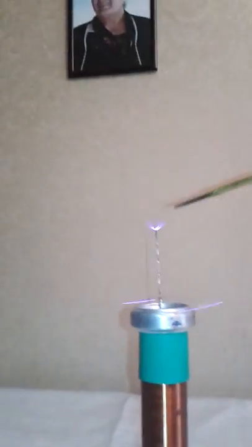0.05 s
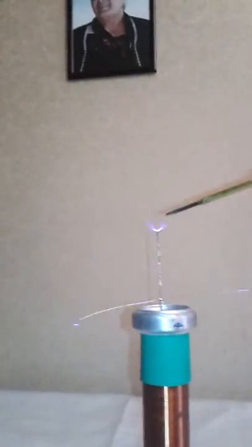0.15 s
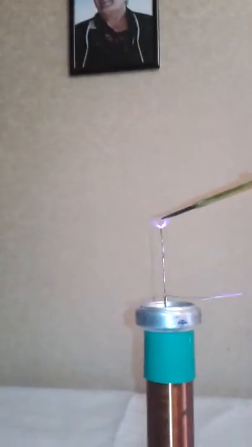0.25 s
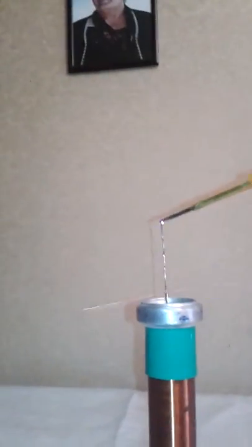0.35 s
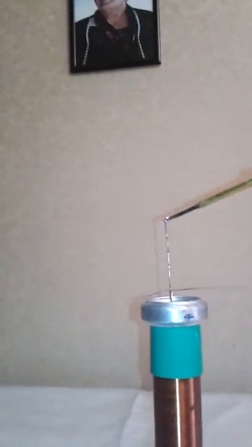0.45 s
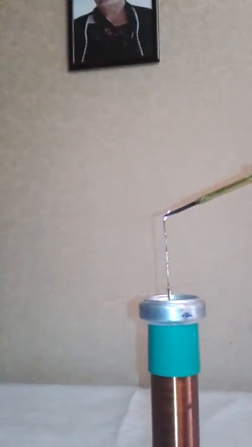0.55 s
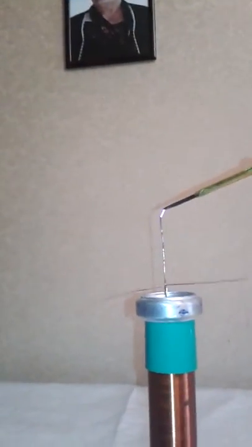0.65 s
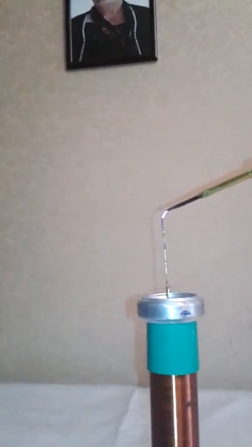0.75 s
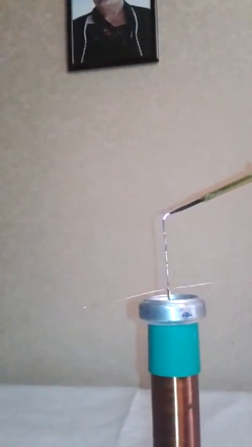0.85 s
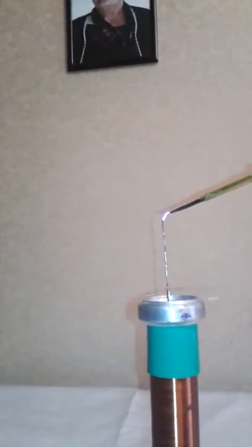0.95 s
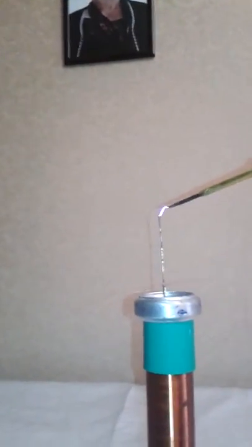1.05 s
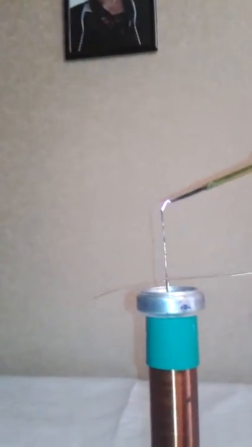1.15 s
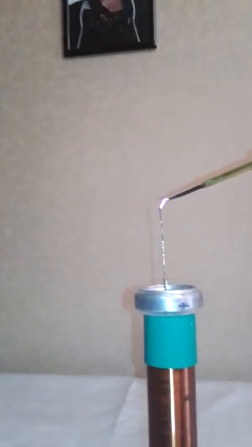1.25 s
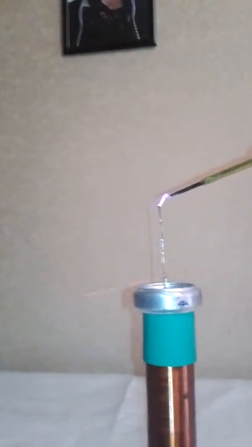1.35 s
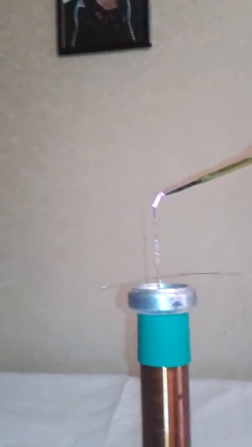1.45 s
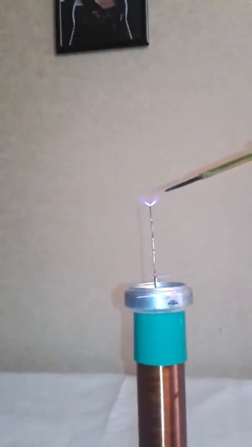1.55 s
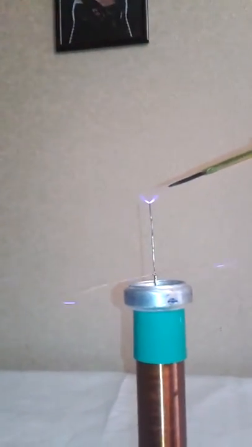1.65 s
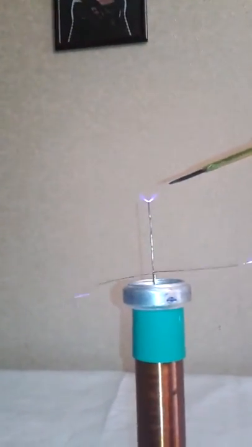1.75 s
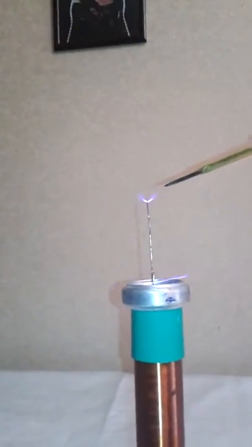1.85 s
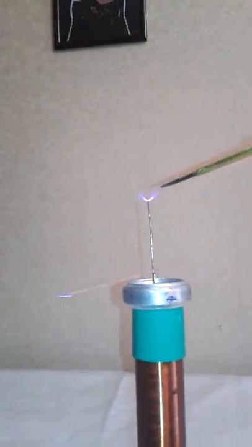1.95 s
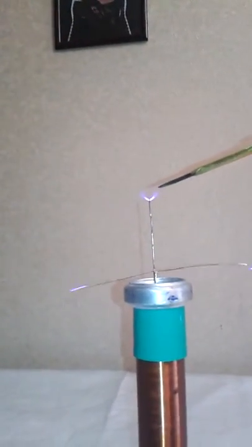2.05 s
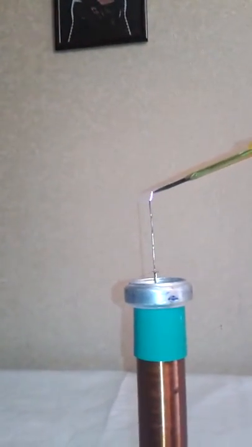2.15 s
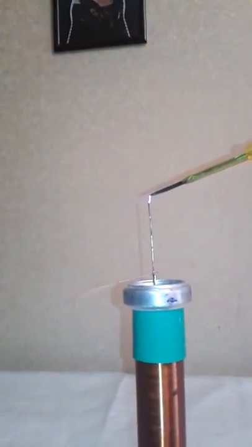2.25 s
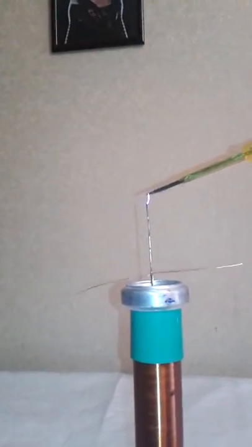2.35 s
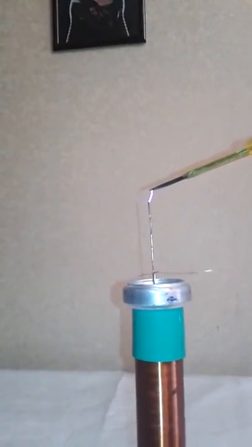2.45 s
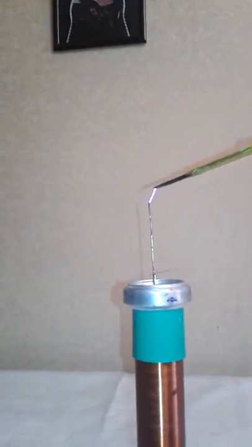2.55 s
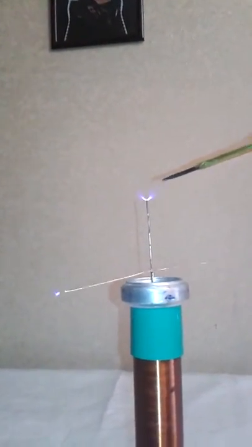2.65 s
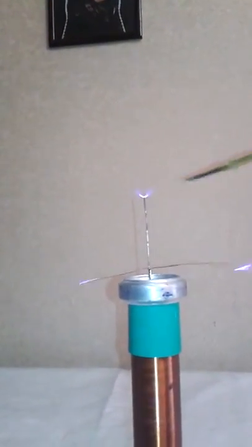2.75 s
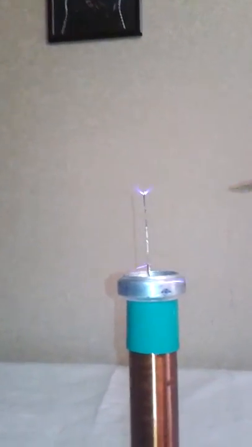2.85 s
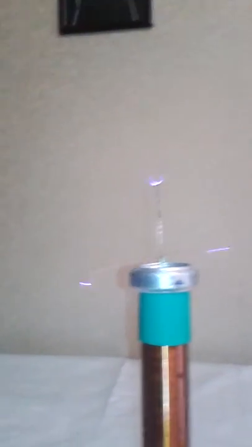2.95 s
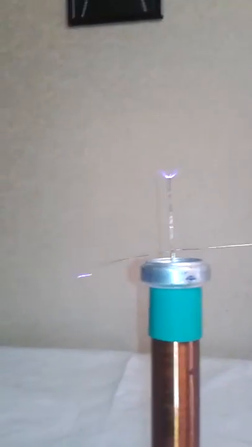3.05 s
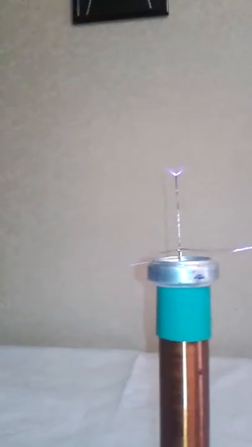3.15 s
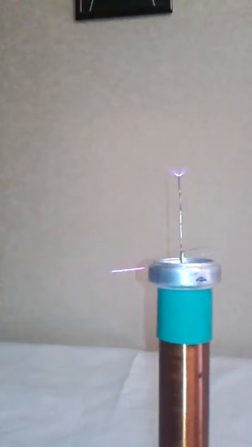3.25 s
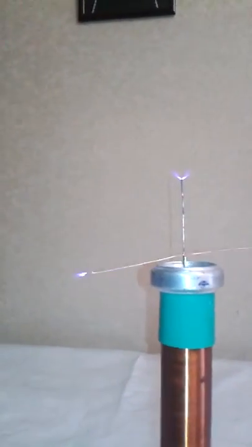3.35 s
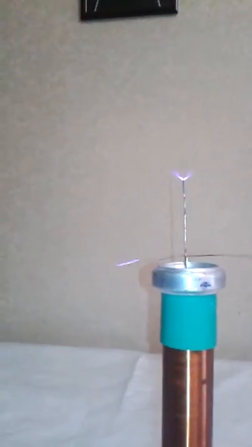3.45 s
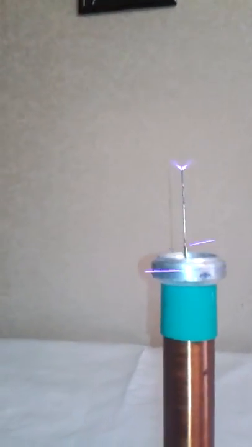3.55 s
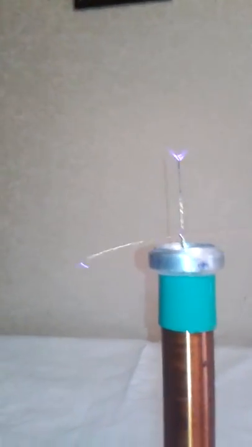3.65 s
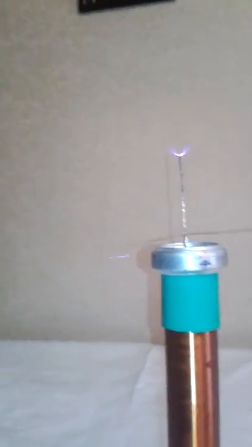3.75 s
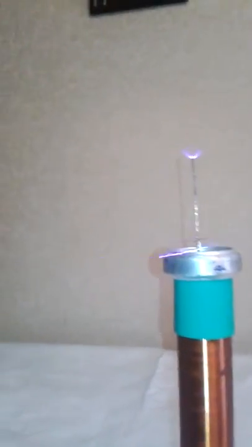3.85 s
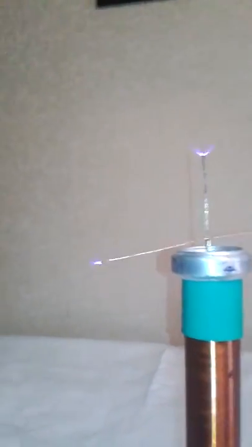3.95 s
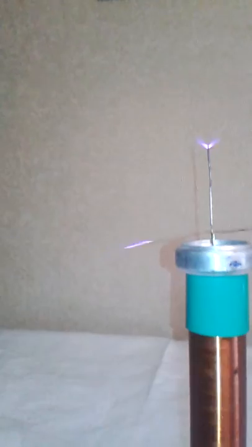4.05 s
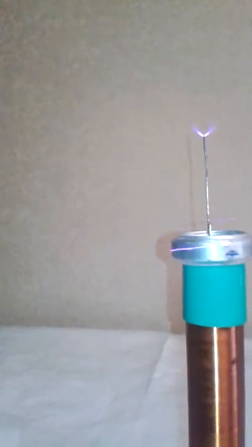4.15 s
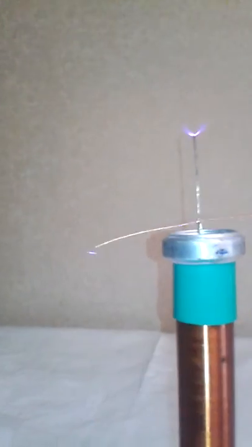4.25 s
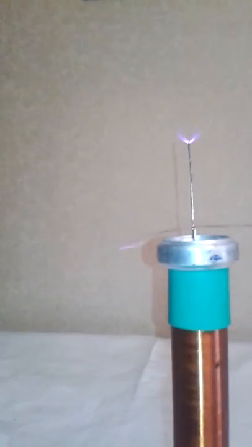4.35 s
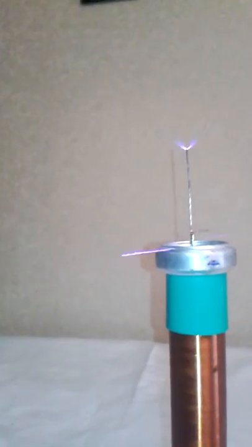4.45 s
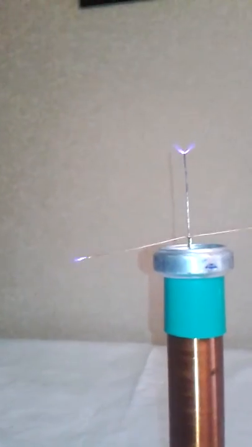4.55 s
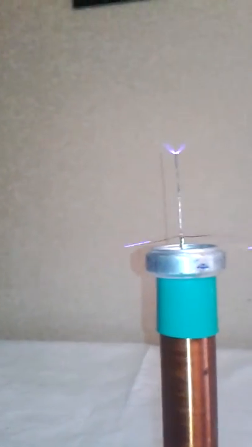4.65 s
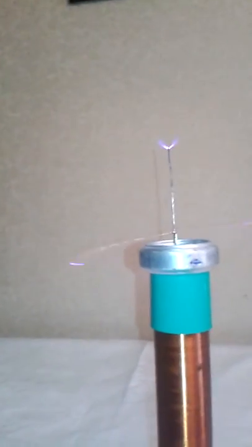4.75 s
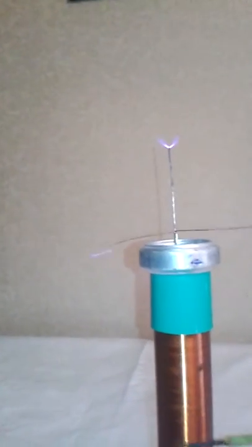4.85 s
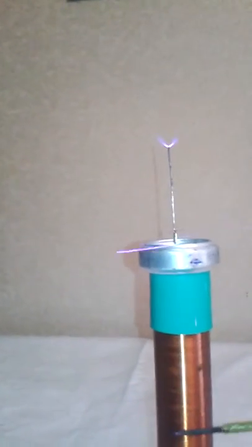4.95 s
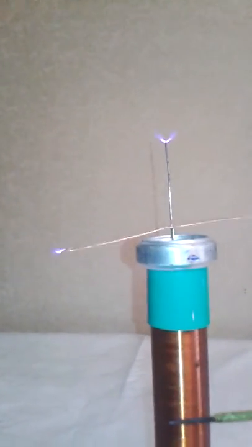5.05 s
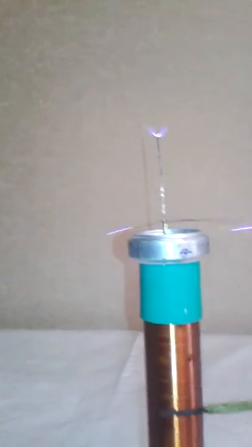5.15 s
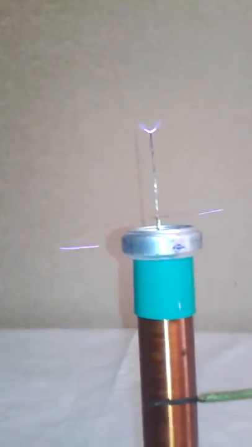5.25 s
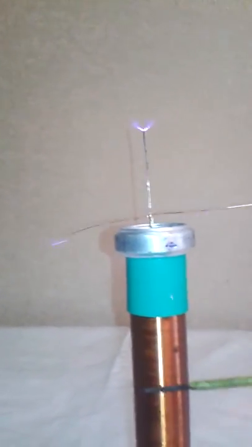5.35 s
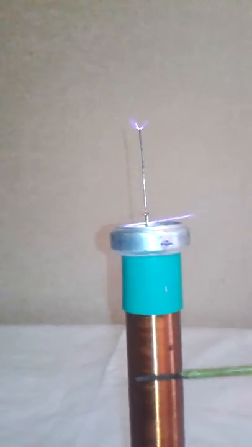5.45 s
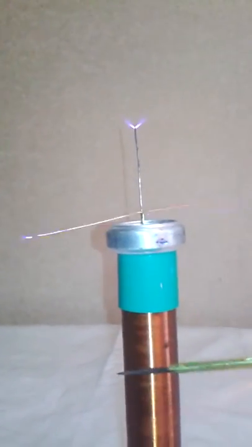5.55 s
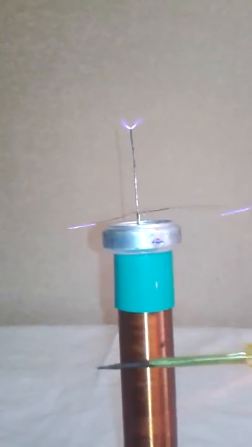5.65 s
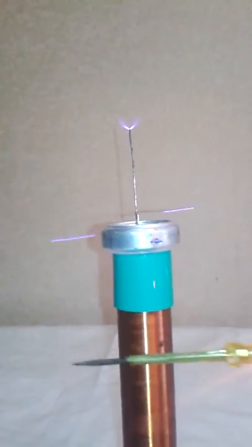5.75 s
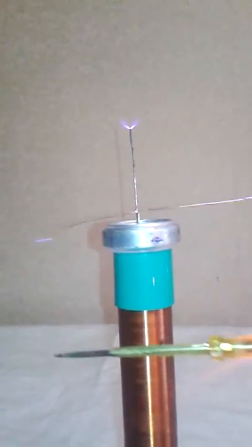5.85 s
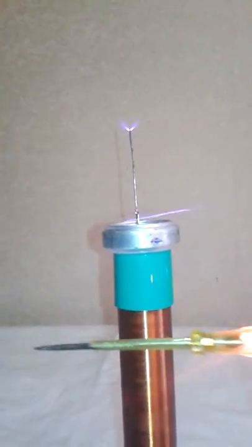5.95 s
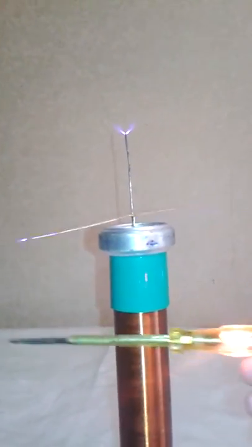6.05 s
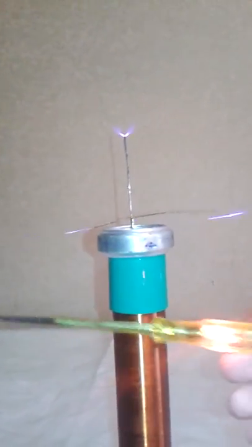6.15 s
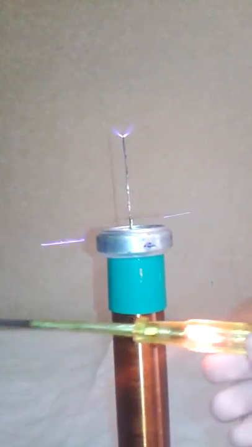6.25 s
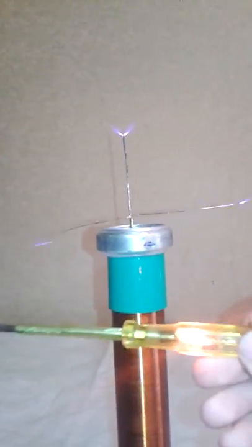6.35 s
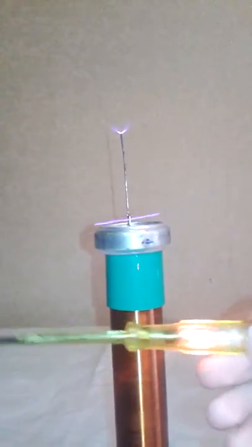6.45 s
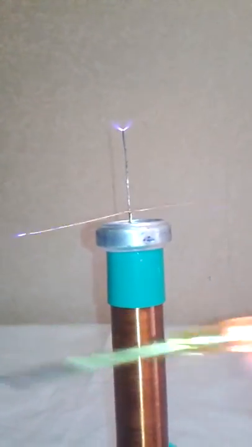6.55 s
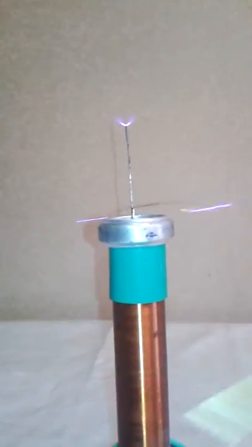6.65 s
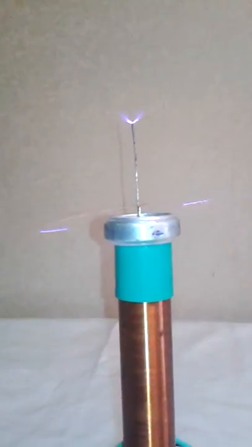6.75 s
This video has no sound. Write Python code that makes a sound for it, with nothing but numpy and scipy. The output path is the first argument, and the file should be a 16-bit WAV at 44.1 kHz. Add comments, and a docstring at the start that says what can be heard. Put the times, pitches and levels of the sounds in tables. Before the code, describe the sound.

A small high-voltage coil hisses and crackles with a thin, high ring, flaring in short bursts with sharp little snaps.

```python
"""Corona sprays from a wire tip and a spinning wire on a small high-voltage coil: a dense rain of tiny
sparks that flares in short bursts and sinks to a quiet arc while a rod is held near. It stands in a
quiet room and sounds dry, as from close by, on one small mono microphone that rings in the treble.
Behind it the room rumbles and hums, with soft low thuds and brief low tones swelling in its wash,
and a small hard thing is tapped."""
import sys
import numpy as np
from scipy import signal
from scipy.io import wavfile
from scipy.ndimage import uniform_filter1d

SR = 44100
rng = np.random.default_rng(int(sys.argv[2]) if len(sys.argv) > 2 else 0)


def wav_out(sig):
    """Save sig, one row per channel (or a flat mono array), as 16-bit PCM at SR to the path in sys.argv[1]."""
    wavfile.write(sys.argv[1], SR, np.round(np.clip(np.atleast_2d(sig).T, -1, 1) * 32767).astype(np.int16))


N = 298998

# Self noise of the microphone: frequency_hz, gain_db
HISS_COLOUR = [(500, 0), (2400, -1.5), (2950, -2), (3600, -5), (12000, -6)]
# Room tone, a low wash over a deeper rumble: time_s, wash_db, rumble_db
ROOM_LEVELS = [(0.0, -62.5, -72), (0.07, -76, -77), (0.19, -65, -69), (0.32, -71.5, -80),
               (0.43, -68.5, -74), (0.53, -72.5, -76.5), (1.11, -86, -78.5), (1.47, -73.5, -72.5),
               (1.51, -62, -65), (1.6, -64, -60.5), (1.72, -64.5, -72), (1.78, -73, -64),
               (1.98, -63.5, -78.5), (2.42, -77.5, -77), (3.04, -65, -75), (3.15, -75, -78),
               (3.3, -63.5, -76), (3.68, -65.5, -73), (4.06, -62.5, -69), (4.17, -70, -72),
               (4.4, -63.5, -76), (4.52, -59.5, -74), (4.62, -63.5, -79), (4.72, -66, -66),
               (5.05, -64.5, -78), (5.34, -66.5, -70), (5.4, -71.5, -76), (5.56, -73, -67),
               (5.61, -64, -82), (5.75, -62.5, -72), (5.85, -66, -63.5), (6.04, -65, -78), (6.78, -69, -69)]
# Spectra of the wash and the rumble: frequency_hz, gain_db
WASH_COLOUR = [(90, -2.5), (130, -3), (200, 4), (300, 2), (420, -4), (600, -15.5), (1000, -38.5)]
RUMBLE_COLOUR = [(30, -11.5), (45, -2), (63, -2), (85, -9), (120, -2), (200, -53.5)]
# Faint hum in the room: time_s, pitch_hz, level_db
HUM = [(0, 62, -81), (1.0, 59.4, -84), (2.8, 61.3, -76), (3.4, 60.4, -84), (4.2, 60.9, -81),
       (4.7, 60.4, -67), (5.6, 62, -80), (6.2, 65.8, -79), (6.78, 65.2, -65)]
# Soft low thuds, and brief low tones swelling in the room's wash: start_s, level_db, pitch_hz
THUDS_AND_TONES = [(1.505, -55, 480), (1.508, -43, 159), (1.53, -39, 121), (1.566, -46, 190),
                   (1.643, -45.5, 197), (1.588, -46, 201), (1.702, -46.5, 178), (4.513, -40, 223),
                   (4.574, -46, 203), (4.694, -46.5, 300), (4.822, -52, 290), (5.08, -46, 282),
                   (5.345, -49, 275), (5.604, -48, 287), (5.662, -43.5, 284), (5.695, -56, 302),
                   (5.79, -56, 270), (5.74, -45, 251), (4.421, -46, 130)]
# Taps on the hard object: start_s, strength_db, tilt_db_per_octave
TAPS = [(3.917, -38.5, 24), (3.98, -43, 8), (4.205, -45.5, 7), (4.317, -38, 12), (4.742, -52, 4)]
# Modes of that object: pitch_hz, gain_db, t60_s
OBJECT_MODES = [(757, -6, 0.21), (863, 1, 0.15), (1047, -14, 0.21), (1146, -7, 0.16), (1277, -14, 0.087),
                (2000, -28.5, 0.045)]
# A faint discharge at the microphone, all treble ring: frequency_hz, gain_db
RING_COLOUR = [(600, -65), (1200, -53.5), (1900, -51), (2400, -24), (2950, -51.5), (3700, -43.5),
               (4400, -24), (4700, -14.5), (5000, -17), (5400, -8), (5800, -27.5), (6350, 1.5), (6740, 7.5),
               (7100, -1), (7450, -23), (8000, -20), (8600, -59), (12000, -63.5)]
# Body that a strong discharge adds, in three colours: frequency_hz, gain_db
OPEN_BODY = [(300, -26), (627, -23), (922, -14), (1250, -22.5), (1970, -20), (2400, -19), (2900, -15.5),
             (3700, -19.5), (4170, -17), (4520, -21), (4720, -13), (5150, -17.5), (5600, -10.5),
             (6300, -1.5), (7000, -8), (7850, -25.5), (8700, -21.5), (9500, -39.5), (10100, -23.5),
             (10900, -28), (11700, -21.5)]
HOLLOW_BODY = [(300, -17.5), (700, -23), (1200, -14.5), (1550, -15), (1950, -22.5), (2380, -10),
               (2600, -14), (2750, -23.5), (2980, -26), (3250, -23), (3680, -15), (3980, -24.5),
               (4150, -21.5), (4400, -19.5), (4750, -13.5), (5600, -10), (6400, -1), (7000, -16.5),
               (7850, -34), (8700, -21), (9500, -40), (10100, -26), (10900, -41), (11700, -26)]  # mostly early on, perhaps from the angle of the microphone
LATE_BODY = [(300, -32), (627, -18), (1150, -10.5), (1600, -16.5), (2100, -21), (2600, -19.5), (3400, -22),
             (3800, -17.5), (4200, -13), (4520, -23), (4800, -10), (5300, -8), (6300, -5.5), (7000, -4),
             (7850, -29.5), (8700, -16), (9500, -39), (10100, -32), (10900, -55), (11700, -17.5)]  # the last seconds: a lower voice, a dip in the upper midrange
# Blend of the body colours, the rest being open: time_s, hollow_share, late_share
BODY_BLEND = [(0, 0.75, 0.08), (1, 0.92, 0.03), (1.5, 1, 0.05), (2.2, 0.7, 0), (2.6, 0.94, 0),
              (2.9, 1, 0.17), (3.1, 0.53, 0.3), (3.4, 0.37, 0.18), (4.1, 0.1, 0.3), (4.8, 0.23, 0.32),
              (5.5, 0.15, 0.57), (6.1, 0.06, 0.8), (6.78, 0.19, 0.9)]
# Single sharp sparks: time_s, strength_db
SNAPS = [(0.0405, -37.0), (0.0717, -36.5), (0.2105, -37.5), (0.2125, -38.0), (0.2859, -29.5),
         (0.2983, -37.0), (0.3377, -38.0), (0.4104, -44.5), (0.5116, -51.0), (0.5148, -52.5),
         (0.5185, -51.5), (0.5349, -50.5), (0.5393, -52.5), (0.5726, -51.0), (0.5931, -49.0),
         (0.6019, -48.0), (0.6043, -53.0), (0.6098, -42.5), (0.6939, -55.5), (0.7156, -53.5),
         (0.7435, -52.0), (0.813, -57.0), (0.9071, -54.5), (0.9128, -54.5), (0.9171, -57.0),
         (0.9901, -54.0), (1.0079, -54.5), (1.1028, -56.5), (1.1429, -57.0), (1.1965, -58.5),
         (1.1995, -55.5), (1.2214, -50.5), (1.224, -47.0), (1.2661, -49.0), (1.3913, -41.5),
         (1.3936, -44.5), (1.4397, -42.5), (1.4697, -45.5), (1.5503, -43.5), (1.5637, -45.5),
         (1.5749, -45.0), (1.7292, -40.0), (1.8167, -30.5), (1.8469, -33.0), (1.8485, -33.5),
         (1.8501, -34.0), (1.8544, -34.0), (1.9458, -34.0), (1.9591, -33.0), (1.9871, -35.5),
         (2.0985, -35.0), (2.1396, -38.5), (2.189, -45.5), (2.3422, -51.5), (2.4388, -48.5),
         (2.4681, -45.0), (2.4703, -43.0), (2.474, -43.0), (2.5049, -50.0), (2.5711, -48.0),
         (2.6391, -49.5), (2.6568, -48.5), (2.6607, -47.5), (2.6638, -48.0), (2.8004, -43.0),
         (2.8368, -42.0), (2.8445, -38.0), (3.1422, -37.0), (3.1638, -33.5), (3.1662, -31.0),
         (3.1683, -36.0), (3.2732, -36.0), (3.2771, -34.0), (3.2791, -35.5), (3.294, -39.5),
         (3.3076, -38.0), (3.3092, -38.5), (3.3378, -39.5), (3.3587, -39.5), (3.4038, -35.0),
         (3.5706, -34.5), (3.661, -38.0), (3.6644, -37.0), (3.7574, -38.5), (3.778, -33.0), (3.7936, -34.0),
         (3.8051, -28.5), (3.8068, -28.5), (3.81, -31.0), (3.8127, -30.5), (3.827, -36.5), (3.8322, -32.0),
         (3.9009, -33.5), (3.9041, -36.5), (3.9173, -36.5), (3.9206, -32.5), (3.9301, -33.5),
         (3.9326, -33.0), (3.9356, -35.0), (3.9906, -36.0), (3.9963, -37.5), (4.0246, -33.0),
         (4.0802, -32.5), (4.2752, -35.0), (4.2807, -34.5), (4.2832, -34.0), (4.3694, -33.5),
         (4.389, -31.5), (4.3922, -32.0), (4.3965, -29.5), (4.4038, -33.0), (4.4164, -28.0),
         (4.4192, -29.5), (4.4845, -30.0), (4.4931, -28.5), (4.4977, -32.5), (4.4998, -33.0),
         (4.5053, -32.5), (4.5153, -33.5), (4.5204, -33.0), (4.578, -34.5), (4.5874, -33.5), (4.741, -34.0),
         (4.8341, -37.5), (4.9106, -36.0), (4.9143, -41.0), (4.9176, -40.0), (4.9638, -39.0),
         (4.9667, -38.5), (4.9701, -34.0), (5.022, -36.0), (5.0251, -34.5), (5.0277, -39.0),
         (5.0371, -34.0), (5.0416, -34.0), (5.0451, -37.0), (5.0761, -35.5), (5.1405, -41.0),
         (5.1424, -38.5), (5.3136, -38.5), (5.3568, -39.5), (5.4471, -38.0), (5.4573, -41.5),
         (5.5409, -38.0), (5.5502, -40.0), (5.5525, -35.0), (5.5583, -40.5), (5.5623, -38.5),
         (5.6416, -38.5), (5.7192, -37.0), (5.751, -36.0), (5.8035, -35.5), (5.8647, -39.5),
         (5.9439, -43.5), (5.9512, -39.5), (5.962, -38.5), (5.9649, -35.0), (6.0412, -36.0), (6.054, -37.5),
         (6.0571, -37.0), (6.0627, -37.5), (6.0643, -39.5), (6.1213, -37.0), (6.1683, -38.0),
         (6.2641, -36.5), (6.321, -36.0), (6.324, -37.5), (6.4408, -40.0), (6.4499, -38.5), (6.4545, -36.0),
         (6.4566, -38.5), (6.4582, -36.5), (6.5289, -40.5), (6.5308, -38.0), (6.5401, -33.5),
         (6.5458, -39.5), (6.55, -37.0)]
# Bursts of streamers: start_s, length_s, strength_db
FLARES = [(0.04, 0.094, -53), (0.195, 0.0065, -50), (0.26, 0.016, -47.5), (0.28, 0.003, -44),
          (0.292, 0.016, -43), (0.335, 0.042, -51.5), (0.385, 0.014, -54.5), (0.4, 0.019, -53.5),
          (0.51, 0.012, -60), (0.583, 0.007, -72), (0.594, 0.02, -57.5), (0.689, 0.005, -57),
          (0.708, 0.039, -59), (0.744, 0.0081, -60), (0.808, 0.018, -60), (0.903, 0.012, -59),
          (0.984, 0.018, -57), (1.095, 0.003, -61), (1.138, 0.004, -64), (1.194, 0.0067, -55.5),
          (1.213, 0.014, -52), (1.237, 0.035, -53.5), (1.308, 0.065, -55), (1.386, 0.067, -49.5),
          (1.459, 0.018, -51), (1.503, 0.011, -50.5), (1.562, 0.012, -51.5), (1.669, 0.034, -57),
          (1.796, 0.0037, -49), (1.811, 0.007, -40.5), (1.836, 0.0045, -40), (1.843, 0.011, -38),
          (1.864, 0.023, -43), (1.939, 0.025, -39.5), (1.978, 0.013, -43), (2.028, 0.01, -44),
          (2.056, 0.019, -51), (2.133, 0.015, -45), (2.156, 0.004, -46), (2.169, 0.022, -55.5),
          (2.298, 0.04, -60), (2.425, 0.017, -55.5), (2.453, 0.01, -57), (2.465, 0.01, -49),
          (2.558, 0.03, -54.5), (2.651, 0.0078, -53), (2.726, 0.032, -54), (2.814, 0.077, -52.5),
          (2.998, 0.053, -51), (3.119, 0.029, -42.5), (3.149, 0.019, -41), (3.262, 0.048, -47),
          (3.353, 0.011, -46.5), (3.402, 0.011, -51), (3.42, 0.01, -58), (3.544, 0.0089, -44),
          (3.65, 0.034, -46), (3.756, 0.013, -52), (3.77, 0.0087, -39.5), (3.788, 0.01, -43),
          (3.805, 0.014, -42.5), (3.822, 0.017, -43.5), (3.899, 0.0068, -42.5), (3.914, 0.0046, -43),
          (3.927, 0.008, -42), (3.979, 0.0079, -43), (4.02, 0.02, -43.5), (4.105, 0.022, -49),
          (4.274, 0.015, -51), (4.359, 0.017, -46), (4.383, 0.028, -46), (4.409, 0.005, -43),
          (4.418, 0.003, -45), (4.483, 0.041, -45.5), (4.556, 0.032, -46), (4.683, 0.083, -47.5),
          (4.778, 0.062, -50), (4.902, 0.022, -50), (4.957, 0.011, -44.5), (5.021, 0.0072, -40),
          (5.033, 0.0078, -44.5), (5.074, 0.02, -44), (5.133, 0.048, -48), (5.194, 0.076, -47.5),
          (5.323, 0.047, -54), (5.436, 0.018, -53), (5.535, 0.003, -46), (5.548, 0.005, -49),
          (5.556, 0.007, -51), (5.602, 0.056, -52), (5.74, 0.043, -49.5), (5.798, 0.009, -60),
          (5.836, 0.041, -51), (5.942, 0.024, -49.5), (6.051, 0.0083, -45), (6.106, 0.013, -49.5),
          (6.147, 0.13, -49), (6.271, 0.042, -50), (6.313, 0.046, -47), (6.449, 0.005, -45),
          (6.465, 0.003, -50), (6.496, 0.004, -58), (6.528, 0.003, -43), (6.538, 0.011, -43.5),
          (6.588, 0.0077, -53), (6.652, 0.11, -54.5)]
# Steady discharge, low while the rod holds the arc: time_s, strength_db, midrange_crackle_db
CORONA = [(0, -49, -1.5), (0.26, -49, -1.5), (0.47, -60, -1.5), (0.6, -64, 0), (0.67, -63, -9),
          (0.75, -66, -10), (0.92, -64, -16), (1.15, -71, -13), (1.3, -59, -12.5), (1.44, -61.5, -8),
          (1.55, -51.5, -1), (1.89, -47, -3.5), (2.14, -47, -1), (2.165, -53.5, -1), (2.23, -61.5, 2),
          (2.5, -59, -7), (2.72, -54.5, -5), (2.9, -48.5, -4), (3.22, -49, -1), (3.45, -45, -0.5),
          (3.74, -48, 1), (3.8, -48.5, 2), (3.87, -47.5, 3), (4.01, -48.5, 2), (4.1, -43, 0),
          (4.32, -52, 8), (4.45, -48, 3), (4.68, -46.5, 3.5), (4.86, -52, 4), (5.1, -49.5, -1.5),
          (5.355, -47.5, 1), (5.372, -51.5, -1.5), (5.55, -52, -0.5), (5.72, -47.5, -1.5), (5.86, -52, 3),
          (5.9, -52.5, -1.5), (6.05, -51, 0), (6.2, -50, -4.5), (6.35, -50, -0.5), (6.41, -53, -0.5),
          (6.48, -50.5, 2.5), (6.52, -50, 0), (6.78, -47.5, 0)]

HISS_DB, LOW_CUT_HZ, HIGH_CUT_HZ, DC_OFFSET = -93, 58, 11800, -.0003
SNAP_HZ, SNAP_SINK_HZ_PER_DB, SNAP_SPREAD_HZ = 5980, 14, 140  # stronger snaps ring lower
SNAP_WIDTH_S, SNAP_CLICK_DB = .00036, 6
DRAIN_SHARE, DRAIN_S = .75, .003
STRIKE_S, DIE_S = .0011, .0057
SPUTTER_DB, SPUTTERS_PER_S = .7, 40
SAG_SHARE, RECOVER_S = .19, .14
HUSH_SHARE, GATHER_S = .45, .008


def gain_of(db):
    """Decibels to amplitude."""
    return 10 ** (np.asarray(db) / 20)


def unit_rms(x):
    """Scales to rms 1."""
    return x / np.sqrt(np.mean(x ** 2) + 1e-20)


def curve(rows):
    """The columns of a table (time_s, value, ..) read at every sample."""
    times, *columns = np.transpose(rows)
    return np.array([np.interp(np.arange(N) / SR, times, column) for column in columns])


def add(mix, start_s, sound):
    """Mixes a sound in at start_s."""
    part = mix[round(start_s * SR):][:len(sound)]
    part += sound[:len(part)]


def colour(x, spectrum, size=8192):
    """Passes x through a minimum-phase filter of energy 1, shaped by (frequency_hz, gain_db) rows."""
    hz, db = np.transpose(spectrum)
    bin_hz = abs(np.fft.fftfreq(size, 1 / SR)) + 1
    log_gain = np.log(gain_of(np.interp(np.log(bin_hz), np.log(hz), db)))
    response = np.fft.ifft(np.exp(np.conj(signal.hilbert(log_gain)))).real[:size // 2]
    return signal.oaconvolve(x, response / np.linalg.norm(response))[:N]


def wander(per_s):
    """Smooth random motion of rms 1 that changes about per_s times a second."""
    width = max(int(SR / per_s), 1)
    return unit_rms(uniform_filter1d(uniform_filter1d(rng.standard_normal(N), width), width))


def lag(x, time_s):
    """Follows x with the time constant time_s."""
    keep = np.exp(-1 / (time_s * SR))
    return signal.lfilter([1 - keep], [1, -keep], x)


def microphone_hiss():
    """The microphone's own faint noise floor."""
    return gain_of(HISS_DB) * colour(rng.standard_normal(N), HISS_COLOUR)


def room_tone():
    """The quiet room: a lumpy low wash, a deeper rumble and a hum that drifts in pitch."""
    wash_db, rumble_db = curve(ROOM_LEVELS)
    wash = colour(rng.standard_normal(N), WASH_COLOUR) * gain_of(wash_db + wander(21))
    rumble = colour(rng.standard_normal(N), RUMBLE_COLOUR) * gain_of(rumble_db + 2.7 * wander(12))
    hum_hz, hum_db = curve(HUM)
    hum = np.sqrt(2) * gain_of(hum_db + 2 * wander(6)) * np.sin(2 * np.pi * np.cumsum(hum_hz) / SR)
    return wash + rumble + hum


def thuds_and_tones(rise_s=.0045, t60_s=.062):
    """Soft low thuds, and brief low tones swelling in the room's wash: each is one damped sine."""
    out, t = np.zeros(N), np.arange(SR // 4) / SR
    for start_s, db, pitch_hz in THUDS_AND_TONES:
        envelope = gain_of(db - 60 * t / t60_s) * (1 - np.exp(-t / rise_s))
        add(out, start_s, envelope * np.sin(2 * np.pi * pitch_hz * t))
    return out


def taps(rise_s=.00071):
    """Taps ring the modes of a small hard object; a brighter tap favours the upper ones."""
    out, t = np.zeros(N), np.arange(SR // 4) / SR
    hz, mode_db, t60_s = np.transpose(OBJECT_MODES)[:, :, None]
    attack = 1 - np.exp(-t / rise_s)
    for start_s, db, tilt_db in TAPS:
        decays = gain_of(mode_db + tilt_db * np.log2(hz / 1000) - 60 * t / t60_s)
        modes = decays * np.sin(2 * np.pi * hz * t)
        add(out, start_s, gain_of(db - 7) * modes.sum(0) * attack)
    return out


def wire_drift(x, depth_db=1.8, frames=50, bins=3):
    """Narrow bands swell and fade as the wire turns: random patches of about 150 ms by 250 Hz."""
    spectrum = signal.stft(x, nperseg=512, noverlap=384)[2]
    noise = rng.standard_normal(spectrum.shape[::-1])
    patches = uniform_filter1d(uniform_filter1d(noise, frames, axis=0), bins, axis=1)
    spectrum = spectrum * gain_of(depth_db * unit_rms(patches).T)
    return signal.istft(spectrum, nperseg=512, noverlap=384)[1][:N]


def discharge_body(crackle):
    """The broad part of the discharge at the microphone, fading between three colours."""
    hollow_share, late_share = np.clip(curve(BODY_BLEND), 0, 1)
    open_share = np.maximum(1 - hollow_share - late_share, 0)
    return (colour(crackle * open_share, OPEN_BODY)
            + colour(crackle * hollow_share, HOLLOW_BODY)
            + colour(crackle * late_share, LATE_BODY))


def snaps():
    """A sharp spark clicks, kicks the microphone's treble ring and drains the small sparks around it."""
    ring, click, drain = np.zeros((3, N))
    t = np.arange(-66, 66) / SR
    envelope = np.exp(-.5 * (t / SNAP_WIDTH_S) ** 2)
    for time_s, db in SNAPS:
        detune, half_turns = rng.uniform(-.83, 1, 2)
        burst = rng.uniform(-.83, 1, 22)
        hz = SNAP_HZ - SNAP_SINK_HZ_PER_DB * db + SNAP_SPREAD_HZ * detune
        add(ring, time_s + t[0], gain_of(db) * envelope * np.cos(2 * np.pi * hz * t + np.pi * half_turns))
        onset_s = time_s - SNAP_WIDTH_S
        add(click, onset_s, gain_of(db + SNAP_CLICK_DB) * burst / np.linalg.norm(burst))
        add(drain, onset_s - DRAIN_S / 2, np.hanning(round(DRAIN_S * SR)))
    charge_left = 1 - DRAIN_SHARE * np.minimum(drain, 1)
    return ring, click, charge_left


def flare_envelope():
    """Each burst of streamers strikes at once, holds, and dies out in a few ms."""
    envelope = np.zeros(N)
    for start_s, length_s, db in FLARES:
        t = np.arange(round((length_s + .03) * SR)) / SR
        strike = 1 - np.exp(-t / STRIKE_S)
        decay = np.exp(-np.maximum(t - length_s, 0) / DIE_S)
        add(envelope, start_s, gain_of(db) * strike * decay)
    return envelope


def corona_envelope(level_db, flares):
    """The corona sputters, hushes as charge gathers for a flare, and sags once the flare has spent it."""
    sputter_db = SPUTTER_DB * wander(SPUTTERS_PER_S) + 1.5 * wander(200)
    excess_db = 10 * np.log10(1 + (flares / gain_of(level_db)) ** 2)
    sag_db = SAG_SHARE * lag(excess_db, RECOVER_S)
    hush_db = HUSH_SHARE * lag(excess_db[::-1], GATHER_S)[::-1]  # reversed, so it leads the flare
    return gain_of(level_db + sputter_db - sag_db - hush_db)


def spark_rain(per_s, spread_db):
    """Tiny sparks as a white rain of clicks of random sign and size."""
    size = gain_of(spread_db * np.minimum(rng.exponential(1, N), 5))
    return unit_rms(size * rng.choice([-1., 1.], N) * (rng.random(N) < per_s / SR))


def coil_discharge():
    """Corona, flares and snaps: a weak discharge is all treble ring, a strong one gains a broad body."""
    level_db, crackle_db = curve(CORONA)
    flares = flare_envelope()
    corona = corona_envelope(level_db, flares)
    flares *= gain_of(1.8 * np.clip(wander(500), -3, 1.5))  # fast flicker
    ring_sparks, body_sparks = (
        corona * spark_rain(per_s=9000, spread_db=2.47) + flares * spark_rain(per_s=3000, spread_db=.53)
        for _ in range(2))
    snap_ring, snap_click, charge_left = snaps()
    ring = gain_of(-5) * colour(ring_sparks * charge_left, RING_COLOUR) + snap_ring
    # The body grows faster than the level, up to a ceiling.
    strength_db = 10 * np.log10(uniform_filter1d(corona ** 2 + flares ** 2, 400) + 1e-12)
    body_db = .5 * (np.minimum(strength_db, -47) + 44.5) + crackle_db + .6 * wander(29)
    crackle = (body_sparks * charge_left + snap_click) * gain_of(body_db - 4.5)
    return ring + wire_drift(discharge_body(crackle))


def scene():
    """The coil in its room; one microphone feeds both channels."""
    mono = coil_discharge() + room_tone() + taps() + thuds_and_tones() + microphone_hiss()
    return np.tile(mono, (2, 1))


def record(dry):
    """The microphone cuts the deepest bass; the converter limits the band and adds a small offset."""
    low_cut = signal.butter(N=4, Wn=LOW_CUT_HZ, btype="high", fs=SR, output="sos")
    high_cut = signal.firwin(1023, HIGH_CUT_HZ, window=("kaiser", 9), fs=SR)
    return signal.oaconvolve(signal.sosfilt(low_cut, dry), high_cut[None], "same") + DC_OFFSET


dry = scene()
out = record(dry)
wav_out(out)
```